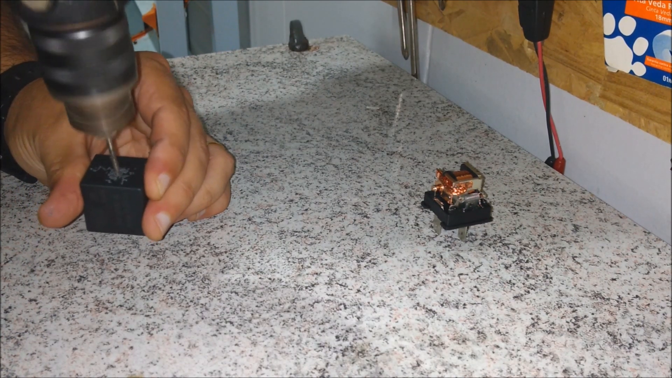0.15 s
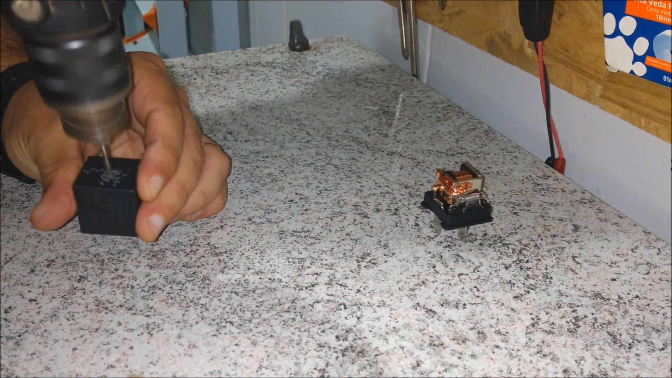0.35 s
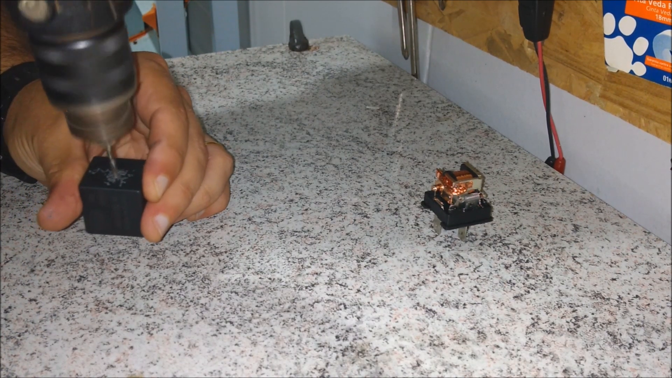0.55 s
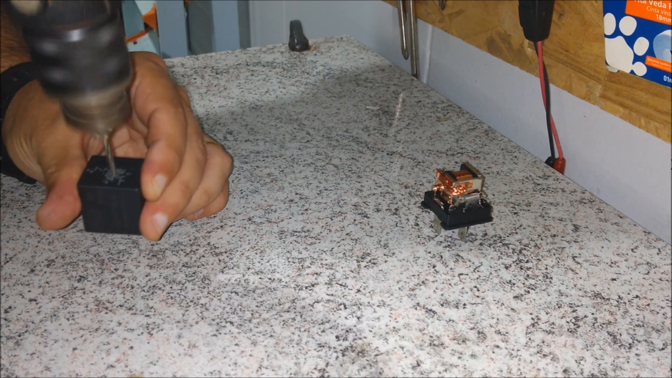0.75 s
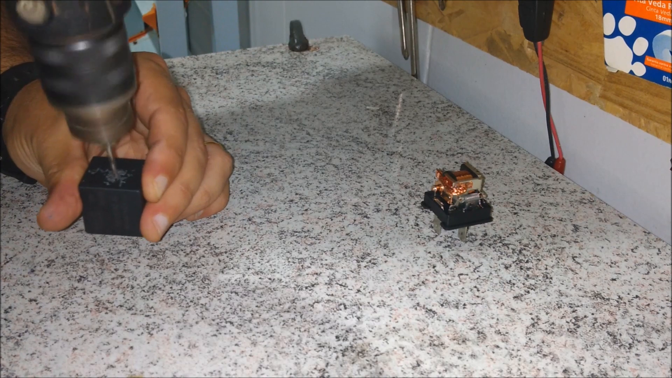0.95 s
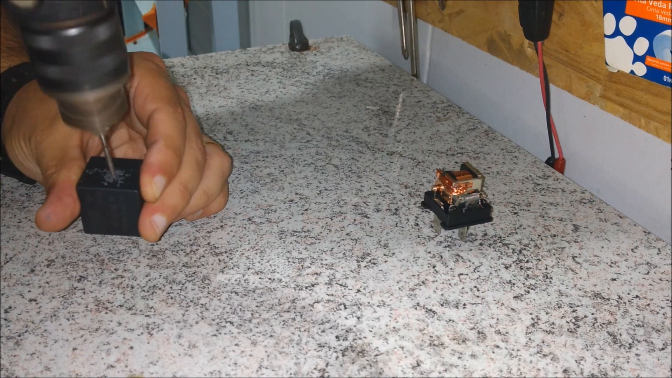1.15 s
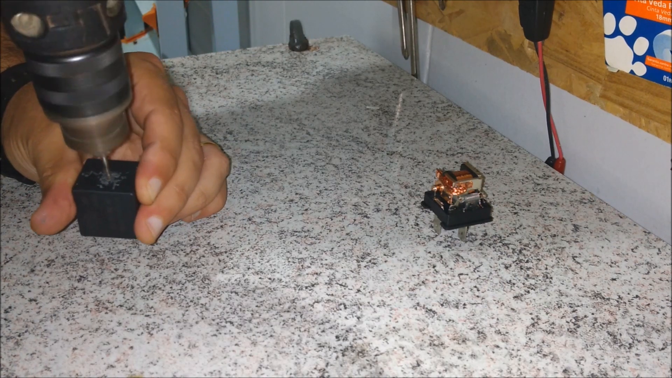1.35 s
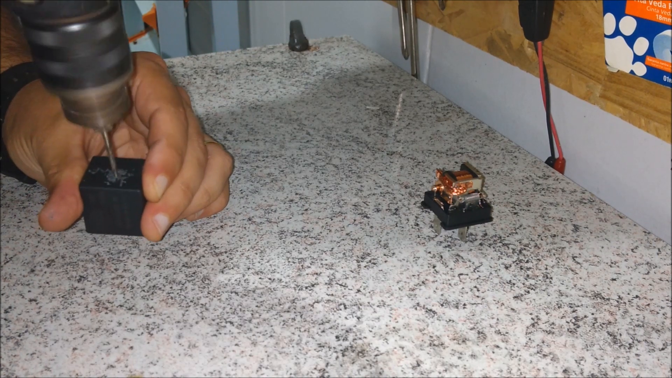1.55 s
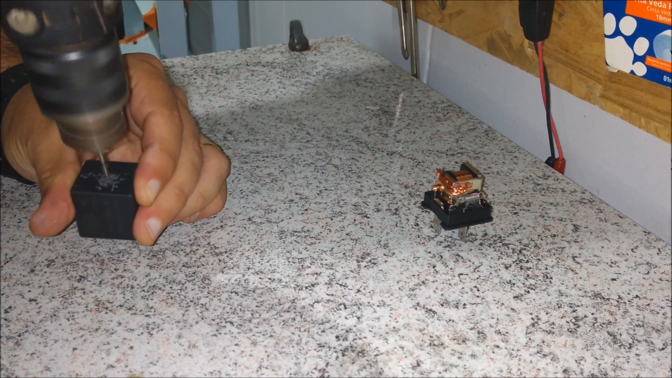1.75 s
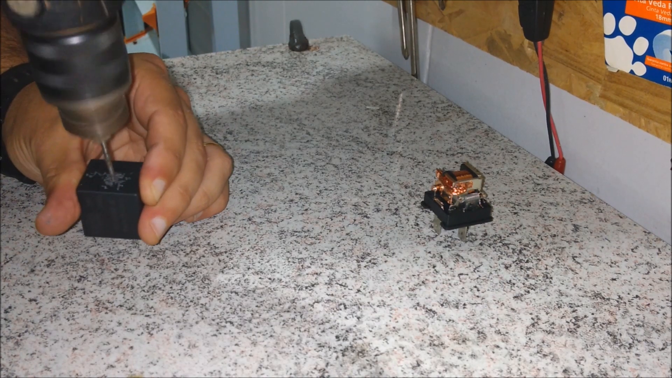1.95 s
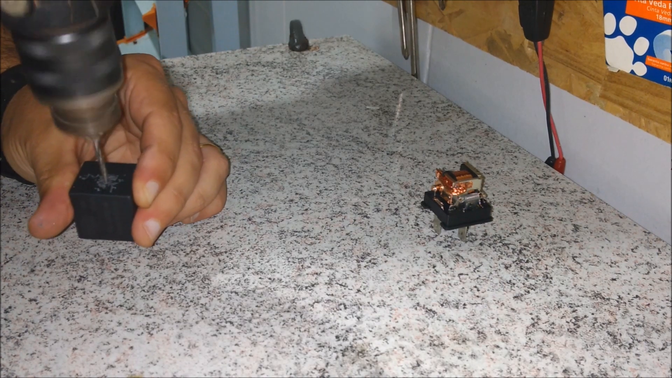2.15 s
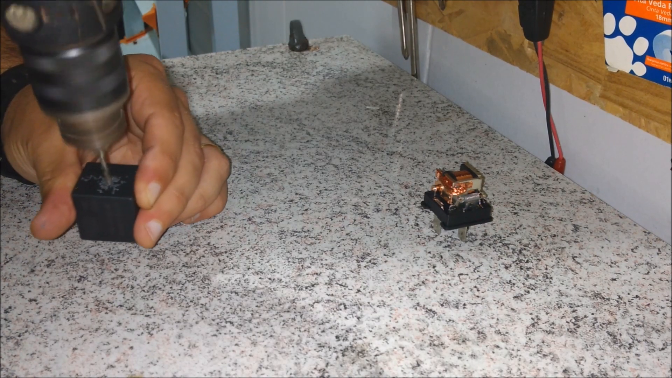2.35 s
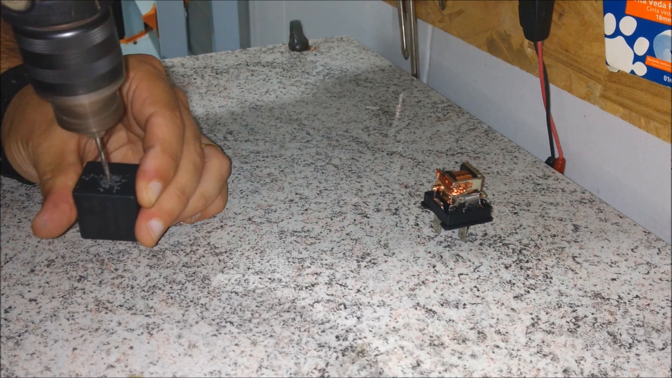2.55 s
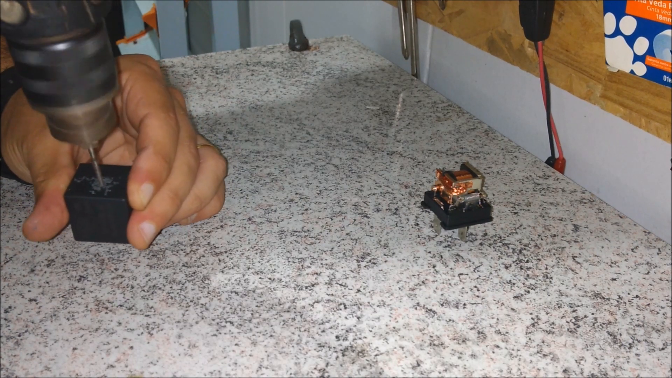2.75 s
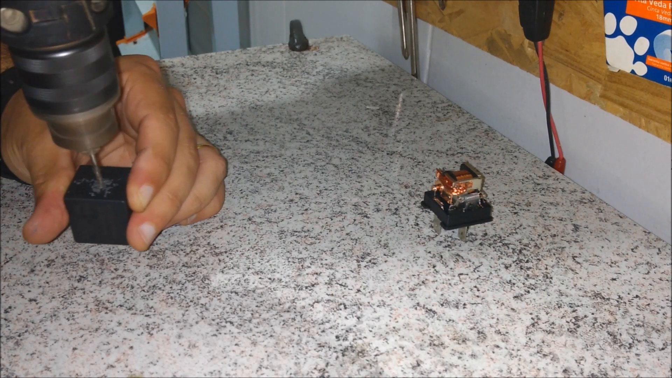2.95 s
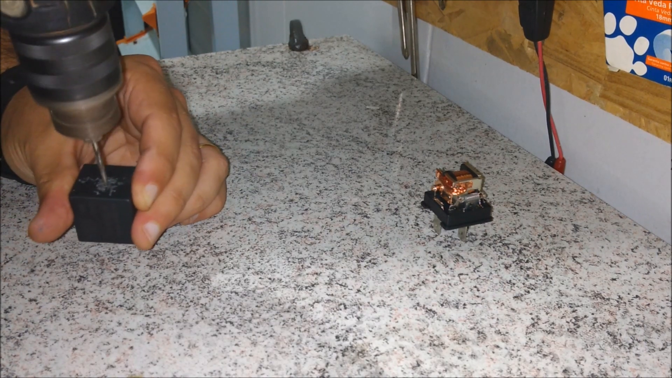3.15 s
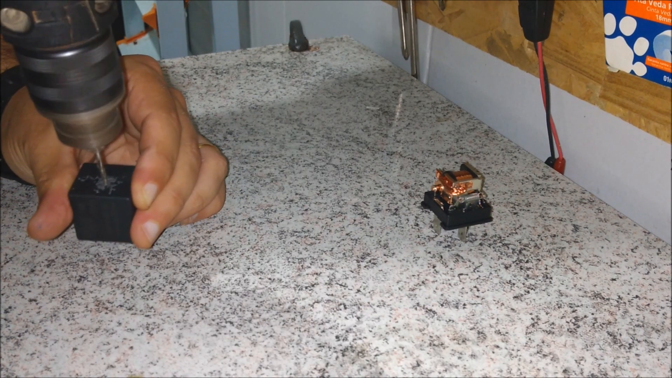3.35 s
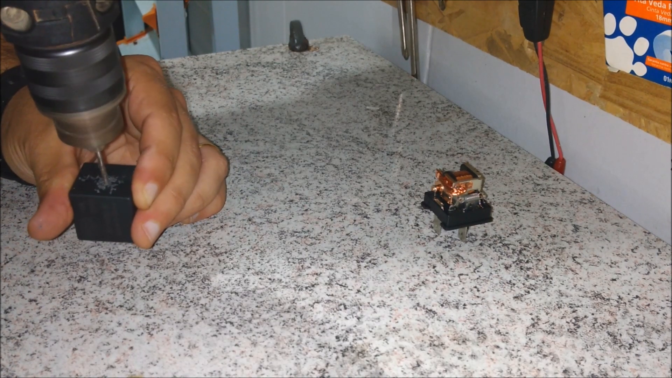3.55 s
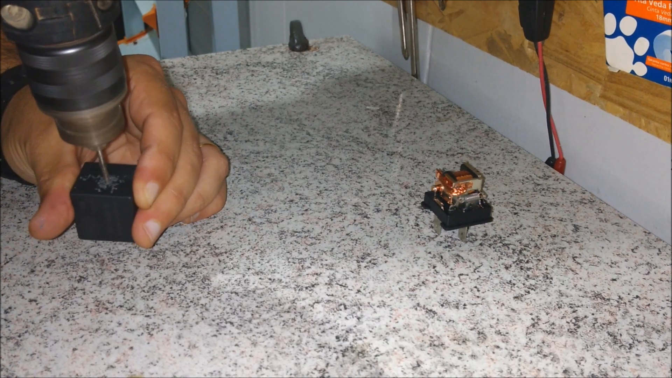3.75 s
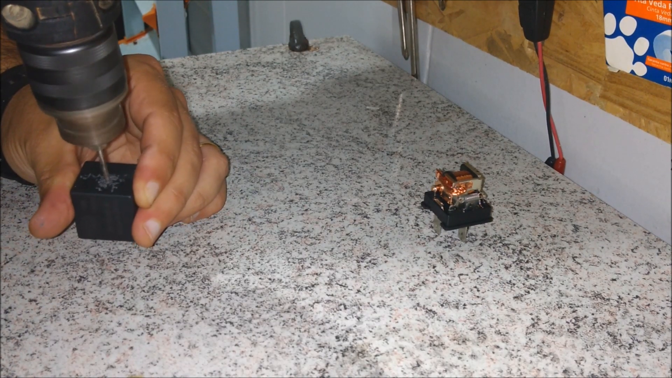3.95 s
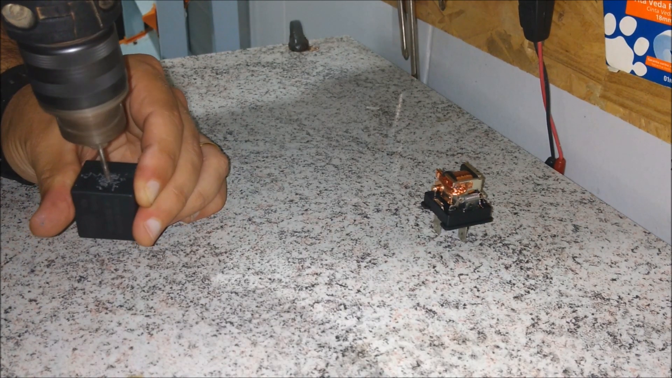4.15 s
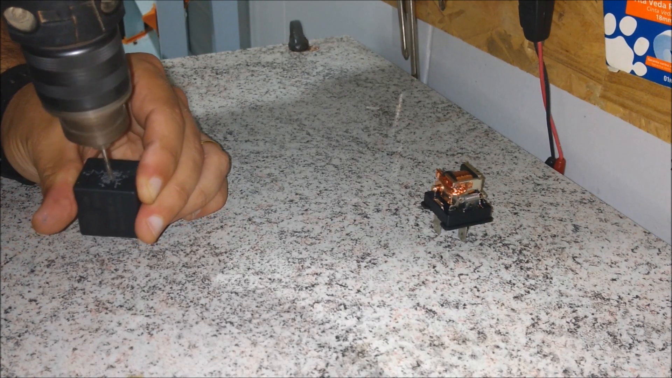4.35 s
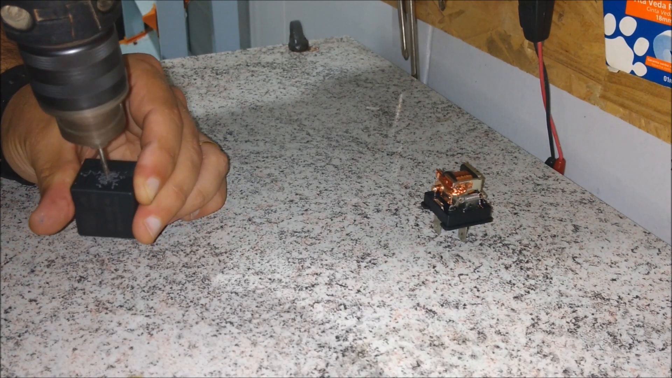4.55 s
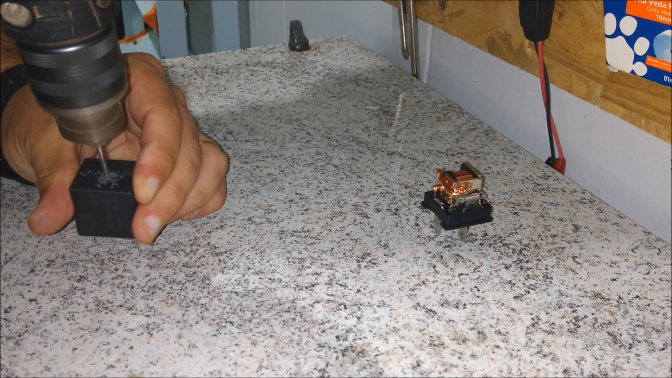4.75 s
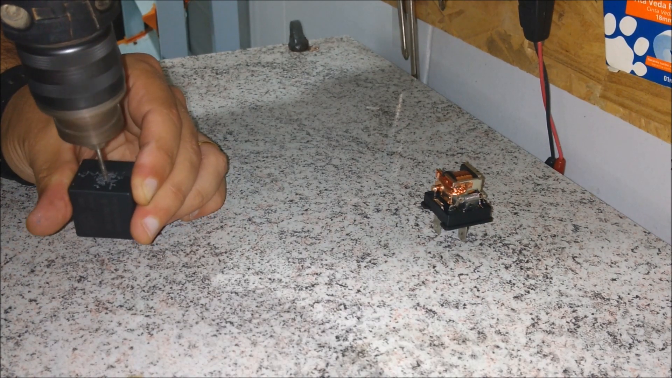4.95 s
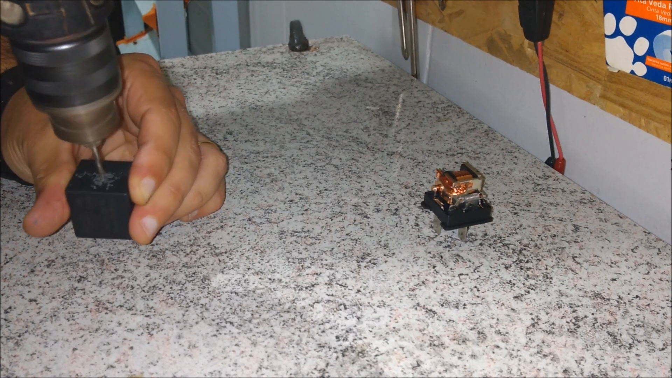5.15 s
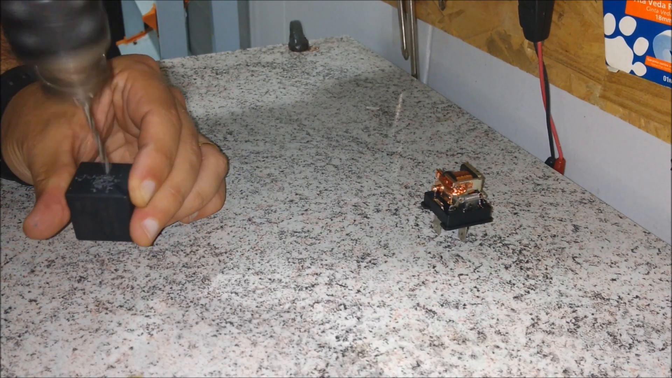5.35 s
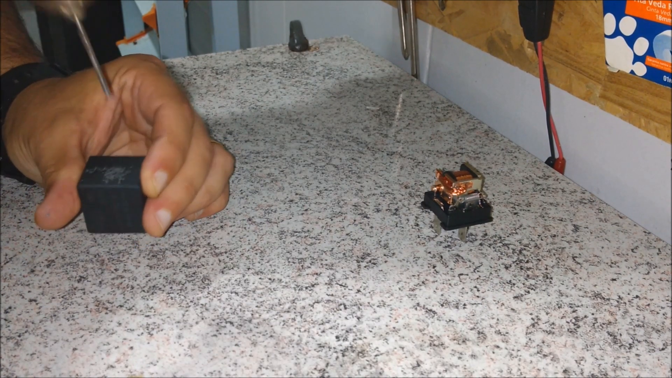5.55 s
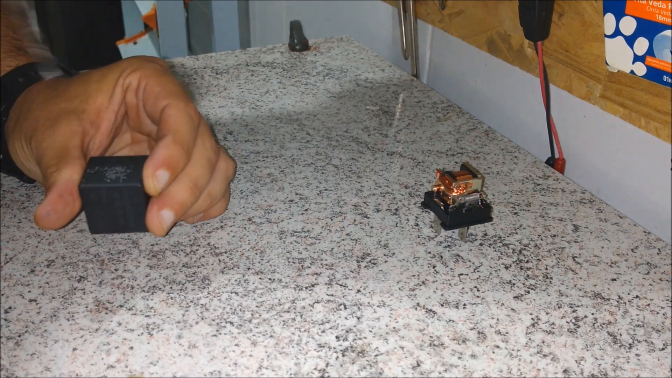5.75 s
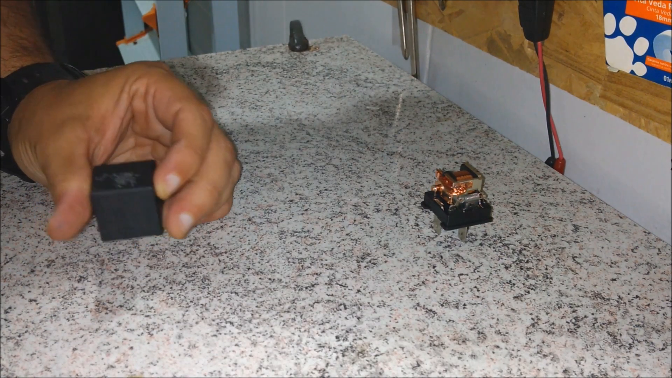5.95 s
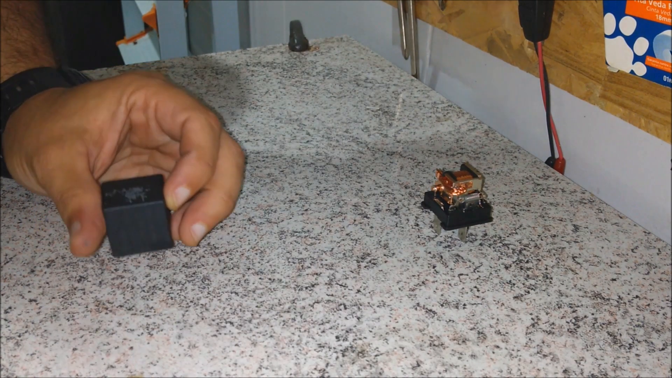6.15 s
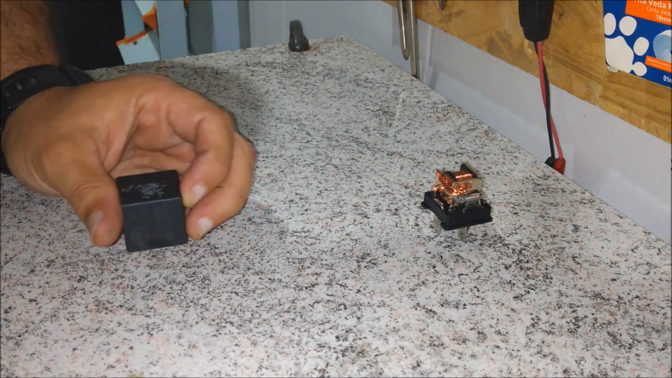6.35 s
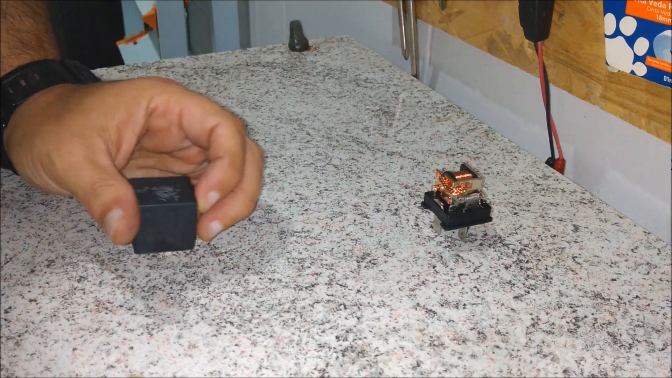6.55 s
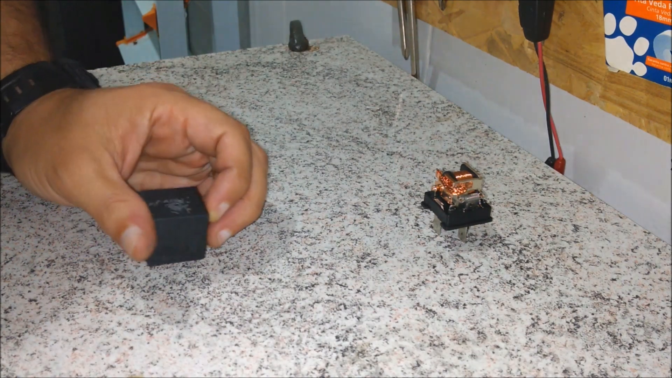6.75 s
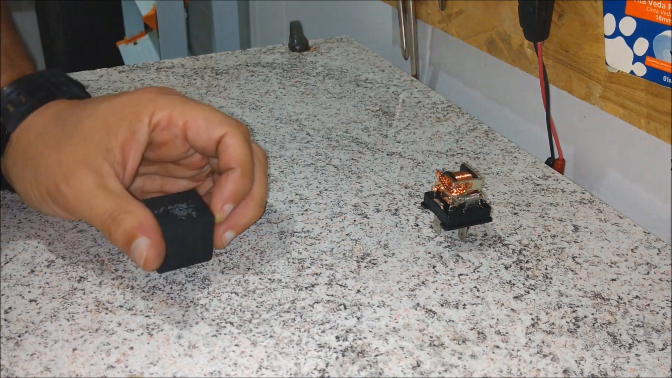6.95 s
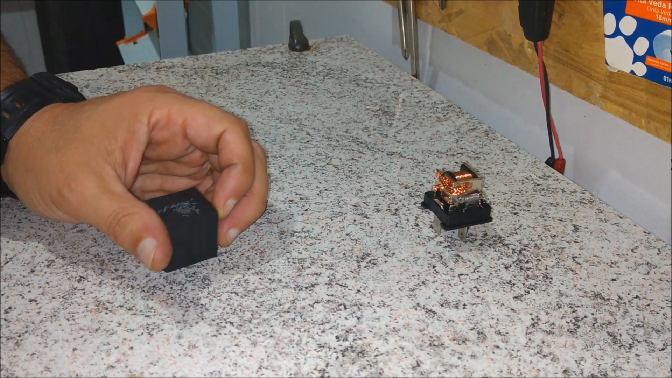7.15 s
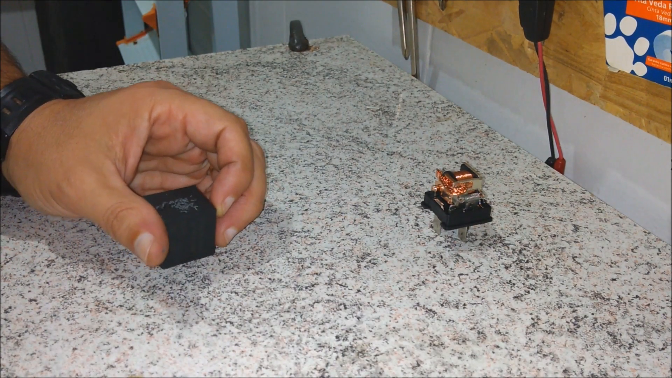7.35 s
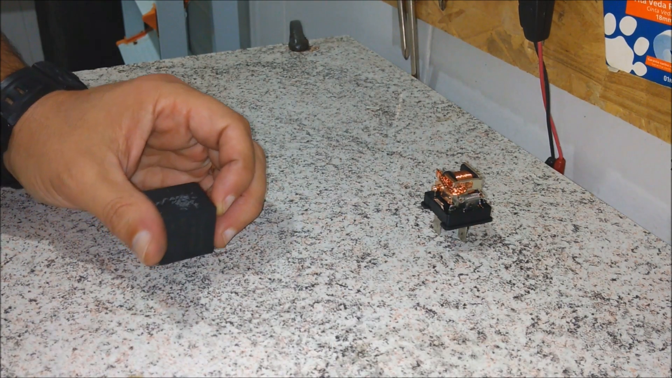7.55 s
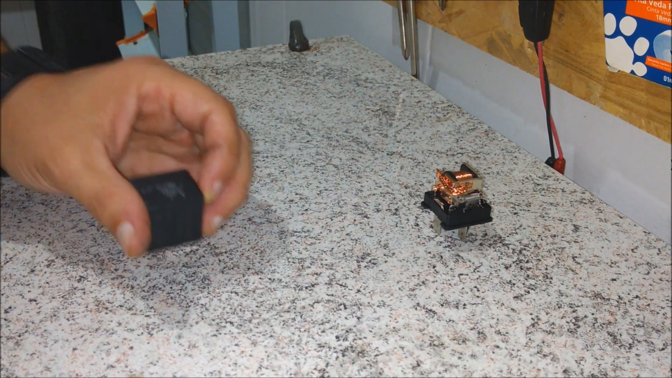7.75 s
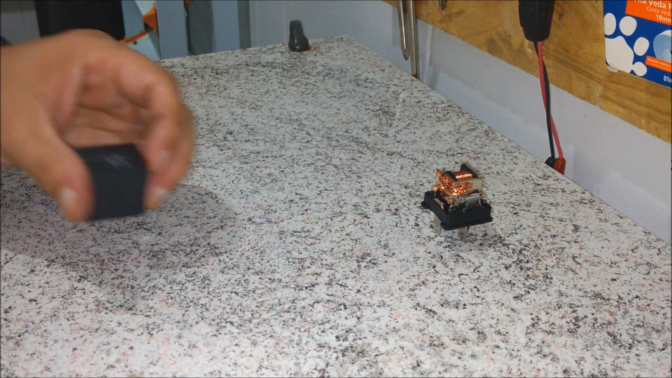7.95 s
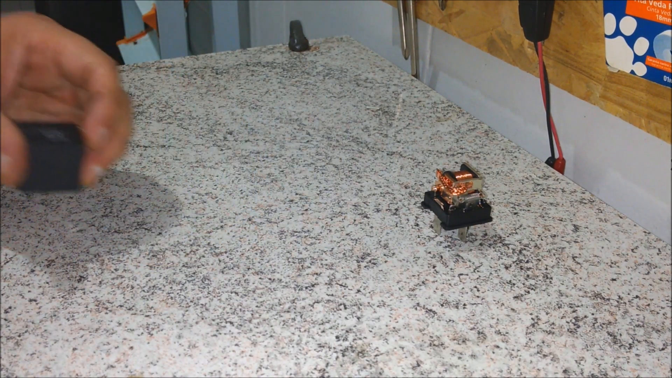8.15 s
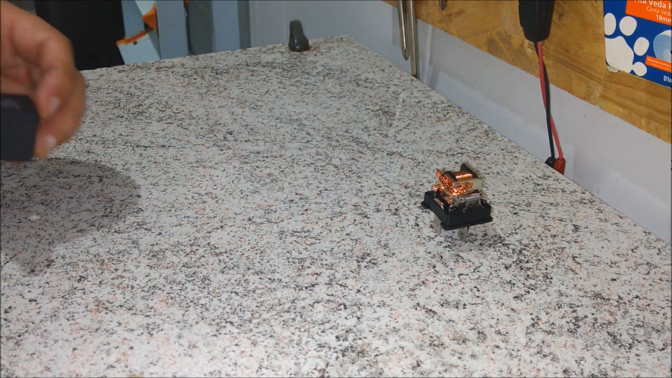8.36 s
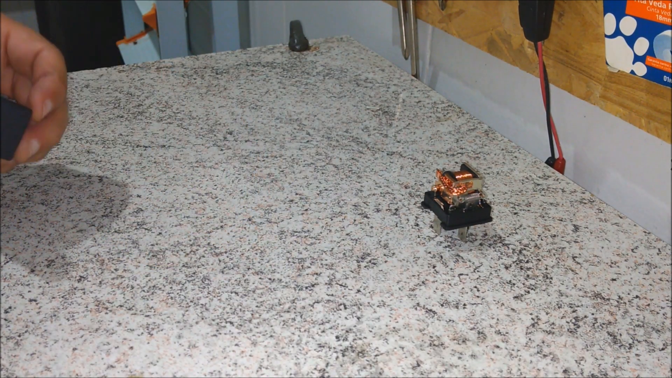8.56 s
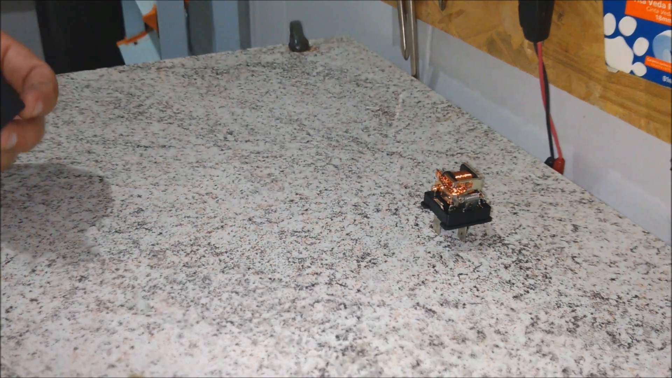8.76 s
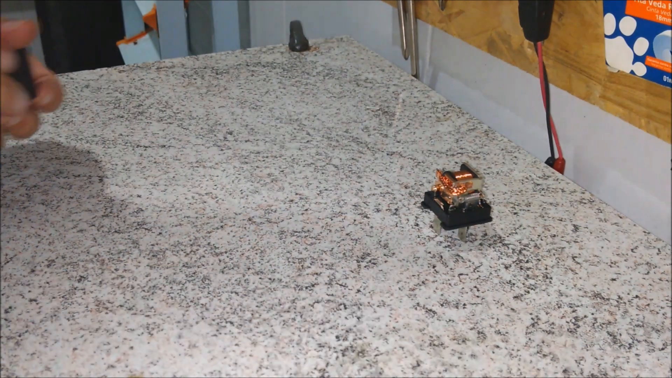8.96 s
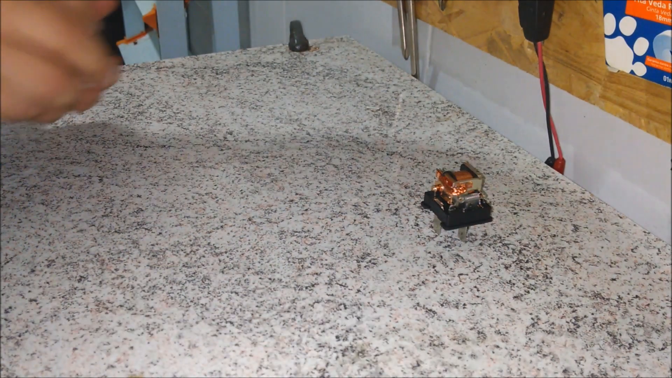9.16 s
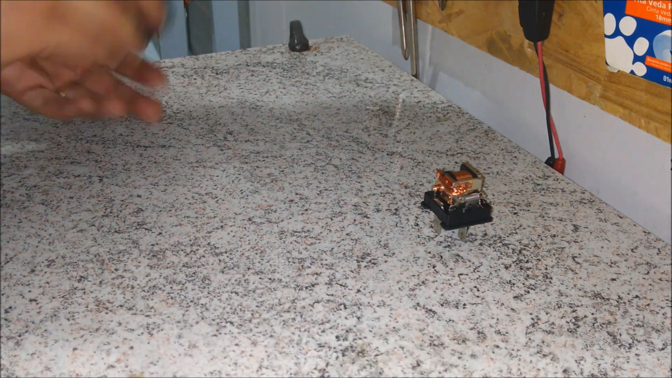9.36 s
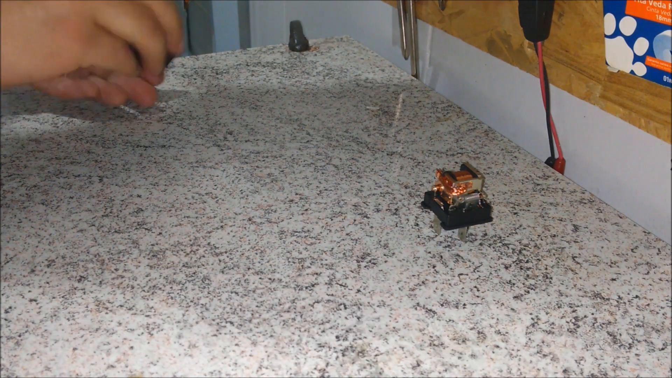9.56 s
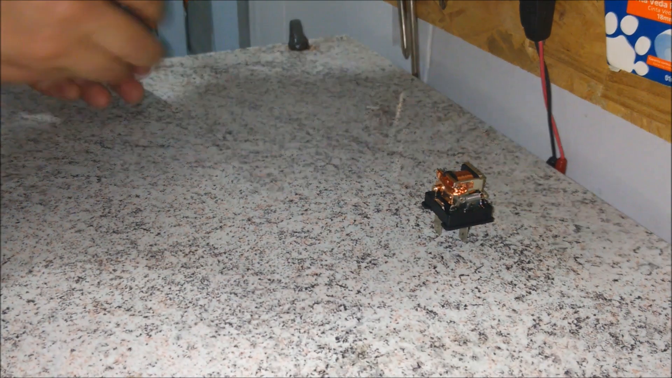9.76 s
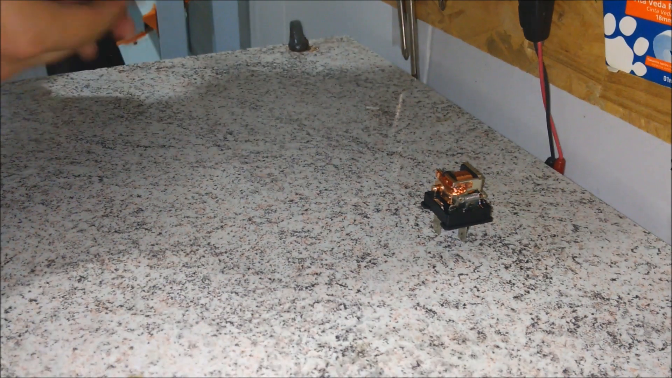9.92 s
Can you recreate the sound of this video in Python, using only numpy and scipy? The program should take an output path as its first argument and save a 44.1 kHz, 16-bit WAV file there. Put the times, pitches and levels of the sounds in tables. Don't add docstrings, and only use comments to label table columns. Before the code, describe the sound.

Close stereo pickup in a small hard room: a mains hand drill at low speed grinds into a small plastic box, rough and rattling, with irregular snags and crackling brush sparks. After about five and a half seconds power is released; a thin whine slides down and the gears clunk to rest. Then the box is tapped and rubbed on a stone bench, with soft low thuds and quiet room air.

```python
import sys
import numpy as np
from scipy import signal
from scipy.fft import rfft, irfft, next_fast_len
from scipy.io import wavfile

SR = 44100
rng = np.random.default_rng(int(sys.argv[2]) if len(sys.argv) > 2 else 0)


def to_wav(s):
    ch = np.atleast_2d(s).T
    pcm = np.round(np.clip(ch, -1, 1) * 32767)
    wavfile.write(sys.argv[1], SR, pcm.astype(np.int16))


def voltage_ratio(decibels):
    exponent = np.asarray(decibels, float) / 20
    return 10 ** exponent


N = 440559

# start_s, peak_db
SNAGS = [(0.015, -19), (0.033, -16), (0.052, -16), (0.087, -30), (0.17, -25), (0.218, -23), (0.237, -20),
         (0.287, -34), (0.35, -23), (0.368, -19), (0.386, -25), (0.416, -18), (0.502, -30), (0.584, -24),
         (0.603, -21), (0.62, -16.5), (0.665, -24), (0.686, -13.5), (0.799, -29), (0.816, -16),
         (0.836, -13.5), (0.903, -17), (0.982, -22), (1, -15), (1.033, -23), (1.053, -17), (1.068, -21),
         (1.134, -29), (1.216, -22), (1.232, -18), (1.249, -23), (1.354, -21), (1.454, -14), (1.489, -19.5),
         (1.588, -29), (1.637, -23), (1.686, -16.5), (1.727, -14), (1.753, -24), (1.77, -11),
         (1.854, -20.5), (1.888, -16.5), (2.021, -21), (2.053, -17), (2.071, -30), (2.104, -18),
         (2.122, -13.5), (2.17, -22), (2.237, -26), (2.29, -26), (2.354, -24), (2.4, -22), (2.433, -25),
         (2.452, -16), (2.484, -15), (2.572, -17), (2.61, -20), (2.667, -22), (2.684, -16), (2.72, -14.5)]
LATER_SNAGS = [(2.791, -20), (2.822, -14), (2.849, -9), (2.904, -28), (2.923, -27), (2.935, -15.5),
               (2.986, -20), (3.005, -19), (3.034, -25), (3.051, -29), (3.185, -11.5), (3.216, -22),
               (3.235, -20), (3.25, -15), (3.268, -18), (3.338, -18), (3.384, -17), (3.401, -27),
               (3.42, -11), (3.471, -16.5), (3.501, -19), (3.538, -21), (3.557, -13.5), (3.653, -30),
               (3.672, -28), (3.734, -20), (3.753, -23), (3.773, -15.5), (3.823, -26), (3.854, -12),
               (3.936, -31), (3.991, -17.5), (4.052, -31), (4.072, -27), (4.088, -15), (4.235, -21),
               (4.253, -17), (4.316, -21), (4.335, -35), (4.386, -27), (4.402, -32), (4.421, -18.5),
               (4.435, -13), (4.486, -36), (4.507, -18), (4.639, -23), (4.736, -21), (4.84, -17),
               (4.885, -26), (4.944, -23), (5.002, -26), (5.026, -32), (5.123, -21), (5.17, -19),
               (5.203, -21), (5.226, -23), (5.246, -20), (5.321, -27), (5.341, -16), (5.437, -21)]
# start_s, peak_db
SPARKS = [(0.0184, -36), (0.0343, -46), (0.0528, -34), (0.0867, -41), (0.1226, -20), (0.151, -21),
          (0.2194, -26), (0.2379, -33), (0.3585, -20), (0.4242, -20), (0.4534, -27), (0.504, -27),
          (0.5696, -42), (0.5844, -28), (0.603, -23.5), (0.7352, -38), (0.7891, -33), (0.8185, -19.5),
          (0.872, -32), (0.9028, -25), (0.9363, -23), (0.998, -26), (1.0335, -43), (1.052, -25),
          (1.1348, -22), (1.2341, -31), (1.2496, -30), (1.2855, -23), (1.3359, -29), (1.3543, -29),
          (1.4022, -33), (1.4202, -30), (1.4361, -22), (1.4536, -29), (1.4885, -36), (1.535, -34),
          (1.5874, -27), (1.6866, -50), (1.7035, -22), (1.728, -26), (1.7526, -19), (1.7696, -27),
          (1.8622, -19), (1.9345, -33), (2.0213, -25), (2.0717, -36), (2.1045, -21), (2.2388, -29),
          (2.2692, -34), (2.2882, -29), (2.467, -25), (2.4848, -32), (2.5711, -25), (2.6105, -30),
          (2.7186, -23)]
LATER_SPARKS = [(2.7713, -27), (2.823, -22), (2.9045, -27), (2.9239, -29), (3.0053, -33), (3.12, -34),
                (3.1699, -32), (3.1853, -30), (3.338, -27), (3.3594, -27), (3.4023, -40), (3.421, -25),
                (3.4704, -20), (3.54, -36), (3.5594, -27), (3.6538, -26), (3.754, -24), (3.8384, -33),
                (3.8548, -19.5), (3.9371, -44), (3.965, -20), (3.9735, -20), (4.0713, -28), (4.0878, -24),
                (4.1062, -24), (4.1861, -29), (4.22, -29), (4.236, -44), (4.4026, -31), (4.432, -25),
                (4.4874, -29), (4.506, -21.5), (4.6226, -39), (4.641, -28), (4.6899, -27), (4.7079, -19.5),
                (4.7732, -29), (4.8032, -30), (4.823, -26), (4.8406, -28), (4.9076, -30), (5.0022, -24),
                (5.0262, -44), (5.0556, -37), (5.09, -36), (5.1239, -28), (5.2063, -25), (5.2242, -22),
                (5.249, -24), (5.295, -32), (5.3075, -27), (5.3345, -21), (5.3744, -29), (5.4696, -40),
                (5.492, -29)]
# time_s, level_db
LOAD = [(0.0, -33), (0.61, -35), (0.95, -33.5), (1.44, -34.5), (1.56, -34), (2.37, -36), (2.72, -35.5),
        (3.03, -36.5), (3.38, -35.5), (3.57, -38.5), (4.81, -35.5), (5.05, -35.5), (5.18, -34.5),
        (5.36, -36), (5.45, -36)]
# bite_s, free_length_s, deepest_db
LULLS = [(0.575, 0.07, -2), (1.35, 0.16, -1.5), (1.847, 0.066, -5), (2.42, 0.16, -1.5), (2.992, 0.05, 0.5),
         (3.126, 0.21, -1), (3.655, 0.12, -0.5), (3.74, 0.065, -2.5), (4.065, 0.05, -1.5),
         (4.632, 0.053, -1.5), (4.778, 0.065, -4), (5.32, 0.031, -4.5), (5.454, 0.094, -5)]
# time_s, tooth_rate_hz, whine_db
COAST = [
    (5.5, 1085, -70),
    (5.55, 1055, -47),
    (5.65, 950, -47),
    (5.78, 822, -48),
    (5.95, 640, -53),
    (6.1, 500, -57),
    (6.3, 310, -58),
    (6.5, 120, -80),
]
# start_s, peak_db
FREE_TICKS = [(5.5838, -44), (5.6152, -39), (5.7165, -42), (5.7489, -41), (5.7708, -36), (5.7928, -37),
              (5.8132, -35), (5.836, -36), (5.8571, -35), (5.8771, -37), (5.905, -30), (5.9225, -34),
              (5.959, -36), (6.0312, -36), (6.079, -33), (6.122, -34), (6.158, -29), (6.2128, -36),
              (6.2333, -34), (6.2667, -41), (6.2901, -38), (6.3096, -50), (6.336, -31), (6.374, -42),
              (6.3999, -46), (6.4169, -43), (6.4393, -49), (6.4965, -37)]
# freq_hz, level_db (per Hz)
BODY = [(50, -17), (100, -10), (200, -6.5), (350, 1), (480, 3.5), (700, 0), (1200, -2), (1700, -4),
        (2300, -5.5), (4000, -5.5), (5200, -11.5), (8500, -10.5), (10500, -18), (15500, -21)]
# pitch_hz, width_hz, gain_db
HOUSING = [(479, 40, 5), (614, 50, 2), (800, 70, 3), (1008, 35, 3), (1126, 50, 3), (1223, 30, 6),
           (1370, 50, 4), (1720, 110, 4), (2600, 250, 3), (3070, 200, 3), (4030, 110, 4), (6330, 140, 4),
           (7430, 300, 2), (8900, 500, 3)]
# start_s, knock_db, knock_hz, upper_ring_db, bright_edge_db
CLUNKS = [(6.29, -42, 1000, -32, -39), (6.335, -43, 1040, -43, -38), (6.373, -56, 990, -52, -52),
          (6.49, -30, 1480, -59, -40), (6.496, -35, 1170, -58, -35), (6.526, -32, 640, -50, -35.5),
          (6.591, -36, 670, -47, -56), (6.627, -39.5, 564, -35.5, -45), (6.731, -37, 680, -37, -49),
          (6.833, -48, 700, -45, -70)]
# start_s, knock_db, knock_hz, upper_ring_db, bright_edge_db
TICKS = [(7.479, -47, 900, -56, -70), (7.501, -39, 720, -47, -62), (7.769, -40, 1370, -55, -60),
         (7.78, -64, 1300, -60, -51), (7.847, -32.5, 634, -33.5, -37), (8.477, -49, 383, -55, -49.5),
         (8.827, -40, 575, -61, -49), (8.98, -60, 400, -62, -53), (9.286, -50, 390, -76, -77),
         (9.615, -59, 681, -69, -76), (9.841, -30.5, 460, -32.5, -46), (9.8401, -35, 1880, -70, -73)]
# start_s, knock_db, knock_hz, upper_ring_db, bright_edge_db
TAPS = [
    (6.888, -38, 700, -40, -73),
    (6.894, -27, 412, -53, -65),
    (7.149, -28, 780, -21, -48),
    (7.161, -25, 1024, -47, -28),
    (7.677, -42, 915, -44, -50),
    (7.957, -49, 625, -48, -49),
    (8.007, -25, 325, -49, -54),
    (8.758, -42, 440, -58, -68),
]
# t60_s, edge_low_hz, edge_top_hz, edge_speed_up (times faster)
CONTACT = [
    (.055, 3800, 12000, 2),
    (.095, 4000, 15500, 2.5),
    (.21, 4200, 15000, 1.15),
]
# pitch_hz, level_db, t60_s
BOX = [(1280, -9, .03), (1800, 2, .025), (2750, -7, .02), (3400, -6, .03)]
# start_s, hold_s, level_db, centre_hz
STROKES = [(7.482, 0.042, -49, 1130), (7.677, 0.014, -48.5, 950), (7.77, 0.1, -51, 1200),
           (7.947, 0.07, -51.5, 1100), (8.034, 0.045, -59, 960), (8.105, 0.04, -46.5, 935),
           (8.197, 0.044, -48.5, 1050), (8.773, 0.029, -46, 2980)]
# start_s, peak_db, pitch_hz, t60_s
THUDS = [(6.884, -40.5, 184, 0.051), (7.157, -35, 221, 0.048), (7.503, -52, 233, 0.067),
         (7.723, -36, 180, 0.15), (7.85, -44.5, 119, 0.15), (7.996, -29, 187, 0.22),
         (8.023, -30, 178, 0.067), (8.196, -50, 116, 0.09), (8.309, -51, 124, 0.092),
         (8.479, -37.5, 198.6, 0.22), (8.815, -45, 190, 0.063), (8.969, -41, 179, 0.21),
         (9.294, -50, 166, 0.24), (9.831, -53, 316, 0.27)]
# pitch_hz, level_db, t60_s
SLAB = [(113.8, -11.5, 0.39), (221, -1, 0.19), (335, -11.5, 0.22)]
# start_s, level_db, t60_s
LEANS = [(6.3, -63, 4.8), (6.89, -46.5, 1.5), (7.4, -61, 3.6), (8.0, -68, 3), (8.6, -53, 2.4),
         (8.95, -64, 1.2), (9.5, -74, 2), (9.85, -59, 3)]
# start_s, level_db, t60_s
PRESSES = [(6.93, -54, 1.3), (7.72, -31, 1.2), (8.02, -38.5, 3.1), (8.3, -50.5, 4), (8.7, -54, 2.5),
           (9.29, -34, 0.24)]
# freq_hz, level_db (per Hz)
AIR = [(25, 4.5), (60, -16), (120, 0.5), (250, -1.5), (500, -9), (1000, -18), (2000, -19.5), (4000, -23.5),
       (8000, -28), (15500, -33)]
# pitch_hz, width_hz, gain_db
LEFT_PORT = [(440, 26, -3), (625, 70, -3), (932, 190, -5), (1460, 1160, 2), (12000, 5000, 1.5)]

MAINS_HZ, FIRING_S = 59.953, .0042
COAST_START_S, STOP_S = COAST[0][0], 6.62
SNAG_TRIM_DB, SPARK_TRIM_DB = 0.5, -2
# share of cycles, into_cycle_s, scatter_s, level_db, spread_db
SMALL_SNAGS, SMALL_SPARKS = (.7, .0005, .0008, -22, 2.5), (.3, .002, .0015, -35, 3)
SNAG_NOTES_HZ, SNAG_NOTE_DB, SNAG_NOTE_T60_S = (775, 1130, 1248, 1424), -22.5, 0.028
AFTER_SNAG_DB, AFTER_SNAG_T60_S = 6, 0.046
RATTLE_TRIM_DB, HISS_DB, HUM_DB = -8, -45, -52.5
HISS_FOLLOWS, HUM_FOLLOWS = 0.95, 0.64
COAST_DB, COAST_HISS_DB = -38.5, -37.5
SLACK_SPEED, HISS_STEEPNESS = 0.25, 2.1
LIFT_S, LIFT_HUM_DB, LIFTED_HUM_DB = 5.85, -45, -69
ROTOR_TEETH, ROTOR_THROB = 16, .4
FREE_TICK_TRIM_DB, FREE_TICK_T60_S = 6, 0.014
FREE_HISS_DB, FAN_SING_DB, FREE_RING_DB = -1.5, 3, 2
RUB_RISE_DB_PER_S, RUB_FALL_DB_PER_S = 900, 229
WEIGHT_RISE_S, DEEP_REST_DB = 0.011, -83
AIR_DB, RUSTLE_ENDS_S, STILL_DB = -65.5, 9.0, -3
ROOM_T60_S, ROOM_DB, DRILL_ROOM_DB = 0.23, -9.5, -13
WOBBLE_S, WOBBLE_HZ = .0015, .6
CROSS_LAG_S, CROSS_BACK_S = 21.7 / SR, 20.4 / SR
CUTOFF_HZ = 15900


def drill():
    rattle_db, hiss_db, hum_db = drill_levels()
    jolts = mains_jolts()
    coast_s = np.clip(np.arange(N) / SR - COAST_START_S, 0, 1)
    turn = 2 * np.pi * np.cumsum(in_time(COAST)[0]) / SR
    drive = gears(jolts, rattle_db, hum_db, coast_s > 0)
    drive += brushes(jolts, hiss_db, coast_s, turn)
    sound = colour(drive + whine(turn), BODY, HOUSING)
    bass = signal.sosfilt(signal.butter(2, 650, fs=SR, output="sos"), sound[1])
    late = np.roll(bass, int(.0012 * SR))
    return sound - [[.8], [0]] * late - [[.45], [0]] * band(sound[0], 30, 620)


def mains_jolts():
    firings = np.arange(FIRING_S, COAST_START_S, 1 / MAINS_HZ)
    luck = rng.standard_normal((len(firings), 2))
    return swell(marks(firings + .0006 * luck[:, 0], voltage_ratio(3.0 * luck[:, 1])), .035, .001)


def gears(jolts, rattle_db, hum_db, coasting):
    snag_s, peak_db = with_small(SNAGS + LATER_SNAGS, SNAG_TRIM_DB, *SMALL_SNAGS)
    tilt_db = 1.6 * rng.standard_normal(len(snag_s))
    box = voltage_ratio(rattle_db + 4.0) * gear_gate(jolts, 130, 0.061)
    box += swell(marks(snag_s, voltage_ratio(peak_db - 4 - tilt_db)), 0.0059, 0.00072)
    chuck = voltage_ratio(rattle_db + 3.0) * gear_gate(jolts, 220, .7)
    chuck += swell(marks(snag_s, voltage_ratio(peak_db - 1.5 + tilt_db)), 0.007, 0.0008)
    crack = marks(snag_s + 0.00105, voltage_ratio(peak_db + 10.0)) * [[-.6], [1]]
    drive = 0.78 * band(box * noise() + crack, 140, 2420)
    drive += 1.156 * band(chuck * noise() + crack, 1770, 4920)
    wall = rng.integers(0, len(SNAG_NOTES_HZ), len(snag_s))
    for k, hz in enumerate(SNAG_NOTES_HZ):
        plucks = marks(snag_s, voltage_ratio(peak_db + SNAG_NOTE_DB) * (wall == k))
        drive += [[-.6], [1]] * ring(plucks, hz, SNAG_NOTE_T60_S)[None]
    drive += voltage_ratio(rattle_db - 3 - 5 * coasting) * strikes(jolts, 900, 7)
    drive += voltage_ratio(FREE_RING_DB) * coasting * band(chuck * noise(), 2540, 2900)
    return drive + voltage_ratio(hum_db + 17.0) * band(rms_one(box) * noise(), 32, 180)


def brushes(jolts, hiss_db, coast_s, turn):
    coasting = coast_s > 0
    spark_s, spark_db = with_small(SPARKS + LATER_SPARKS, SPARK_TRIM_DB, *SMALL_SPARKS)
    brush = voltage_ratio(hiss_db + 11.5) * gear_gate(jolts, 200, 0.13)
    brush += swell(marks(spark_s, voltage_ratio(spark_db + 5)), 0.017, 0.00016)
    brush *= 1 + ROTOR_THROB * coasting * np.sin(turn / ROTOR_TEETH)
    tick_s, tick_db = np.transpose(FREE_TICKS)
    brush += swell(marks(tick_s, voltage_ratio(tick_db + FREE_TICK_TRIM_DB)), FREE_TICK_T60_S, .0003)
    slots = noise() * brush * coasting
    sing = voltage_ratio(FAN_SING_DB) * (band(slots, 7760, 7780) + band(slots, 9040, 9080))
    hiss = band(brush * noise(), 4550, 12000) * voltage_ratio(FREE_HISS_DB * coasting)
    top = band(brush * noise(), 11650, 18800) * voltage_ratio(-5.0 * coasting - 4.2 * coast_s)
    return sing + hiss + top


def whine(turn):
    teeth = np.zeros((2, N))
    for k, db in enumerate([-8, 4, 1, 0, -4, -8], 1):
        teeth += np.sin(k * turn + [[0], [k]]) * voltage_ratio(db)
    high = 1.3 * band(band(teeth, 2450, 3300), 2400, 3450)
    low = [[.25], [.6]] * band(band(teeth, 1780, 2150), 1720, 2200)
    return (high + low) * voltage_ratio(in_time(COAST, -150)[1])


def gear_gate(jolts, per_s, depth):
    sizes = voltage_ratio(4.5 * np.minimum(rng.exponential(1, N), 3))
    knocks = (rng.random(N) < per_s * (.3 + 2 * jolts) / SR) * sizes
    load = np.where(np.arange(N) / SR < COAST_START_S, 1, .12)
    return rms_one(1 + 3.4 * jolts + depth * load * swell(knocks, .012, .0003))


def strikes(jolts, per_s, cycles):
    sizes = voltage_ratio(4.5 * np.minimum(rng.exponential(1, (2, N)), 3)) * rng.choice([-1, 1], (2, N))
    struck = sizes * (rng.random(N) < per_s * (.4 + 2.5 * jolts) / SR)
    dealt = rng.integers(0, 14, N)
    out = np.zeros((2, N))
    for k, hz in enumerate(np.geomspace(520, 4300, 14)):
        out += hz / 1000 * ring(struck * (dealt == k) + 1e-18, hz, cycles / hz)
    return rms_one(out)


def drill_levels():
    t = np.arange(N) / SR
    load_db = in_time(LOAD)[0] + grip_db()
    swing_db = load_db - np.mean(np.array(LOAD)[:, 1])
    speed = np.clip((STOP_S - t) / (STOP_S - COAST_START_S), 1e-4, 1)
    run_down_db = 20 * np.log10(speed / (speed + SLACK_SPEED))
    boring = t < COAST_START_S
    rattle_db = np.where(boring, load_db + RATTLE_TRIM_DB, COAST_DB + run_down_db)
    hiss_db = np.where(boring, HISS_DB + HISS_FOLLOWS * swing_db, COAST_HISS_DB + HISS_STEEPNESS * run_down_db)
    free_db = np.interp(t, [LIFT_S - .1, LIFT_S + 0.24], [LIFT_HUM_DB, LIFTED_HUM_DB]) + run_down_db / 2
    hum_db = np.where(boring, HUM_DB + HUM_FOLLOWS * swing_db, free_db)
    return rattle_db, hiss_db, hum_db


def grip_db():
    t = np.arange(N) / SR
    snag_s, peak_db = np.transpose(SNAGS + LATER_SNAGS)
    free_db = np.zeros(N)
    for bite_s, length_s, depth_db in LULLS:
        free_db += depth_db * np.sqrt(((t - bite_s + length_s) / length_s).clip(0)) * (t < bite_s)
    shaken = swell(marks(snag_s, voltage_ratio(peak_db + AFTER_SNAG_DB)), AFTER_SNAG_T60_S, 0.0014)
    return free_db + 20 * np.log10(1 + shaken)


def with_small(rows, trim_db, share, into_s, scatter_s, small_db, spread_db):
    cycles = np.arange(1, int(COAST_START_S * MAINS_HZ)) / MAINS_HZ
    luck = rng.standard_normal((len(cycles), 2))
    kept = (rng.random(len(cycles)) < share) & (cycles < COAST_START_S - .03)
    lull_db = np.minimum(grip_db()[(cycles * SR).astype(int)], 0)
    level_db = small_db + spread_db * np.clip(luck[:, 1], -3, 1.5) + 2 * lull_db
    s, db = np.transpose(rows)
    times_s = np.r_[s, cycles + into_s + scatter_s * luck[:, 0]]
    return times_s, np.r_[db + trim_db, np.where(kept, level_db, -120)]


def taps():
    out, grain = np.zeros((2, N)), noise()
    hits = [(*row, *kind) for rows, kind in zip((CLUNKS, TICKS, TAPS), CONTACT) for row in rows]
    for s, knock_db, hz, upper_db, edge_db, t60, low_hz, top_hz, faster in hits:
        at = int((s - .001) * SR)
        hit = grain[:, at:at + int(.4 * SR)].copy()
        hit[:, 0] += [2.0, 6.0]
        dying = voltage_ratio(-60 * np.arange(hit.shape[1]) / SR / t60)
        rattle, blow = hit * dying, hit * dying ** 6
        knock = band(band(rattle, .55 * hz, 1.6 * hz), .4 * hz, 2 * hz) + .05 * ring(blow, hz, .04)
        upper = band(rattle, 1300, 4600)
        for mode_hz, mode_db, ring_s in BOX:
            upper += .075 * voltage_ratio(mode_db) * ring(blow, mode_hz, ring_s)
        edge = band(hit * dying ** faster, low_hz, top_hz)
        for part, db in ((knock, knock_db - 0.5), (upper, upper_db + 1), (edge, edge_db + 6)):
            out[:, at:at + hit.shape[1]] += voltage_ratio(db) * part / np.abs(part).max()
    return out


def rubs():
    out, t = np.zeros((2, N)), np.arange(N) / SR
    grains = (rng.random(N) < 300 / SR) * rng.exponential(0.77, N)
    slips = noise() * rms_one(1 + fade(grains, 0.0085))
    dull = rms_one(band(slips, 450, 2300))
    bright = rms_one(band(slips, 1670, 4100) + 0.53 * band(slips, 1900, 9600))
    for s, hold_s, top_db, centre_hz in STROKES:
        rise_db = RUB_RISE_DB_PER_S * (s - t).clip(0)
        fall_db = RUB_FALL_DB_PER_S * (t - s - hold_s).clip(0)
        share = (centre_hz - 500) / 3000
        out += voltage_ratio(top_db - rise_db - fall_db - 4.5) * (np.sqrt(1 - share) * dull + np.sqrt(share) * bright)
    return out


def thuds():
    out = np.zeros(N)
    for s, db, hz, t60 in THUDS:
        push = marks([s, s + 1 / hz, s + 2 / hz], voltage_ratio(db - 3.0) * np.array([.6, 1, 1]))
        out += ring(push, hz, t60)
    blows = marks(np.array(THUDS)[:, 0], voltage_ratio(np.array(THUDS)[:, 1]))
    for hz, db, t60 in SLAB:
        out += voltage_ratio(db) * ring(blows, hz, t60)
    return band(out, 100, 810) * voltage_ratio([[-1], [0.5]])


def weight(rows):
    return sum(swell(marks([s], voltage_ratio(db)), t60, WEIGHT_RISE_S) for s, db, t60 in rows)


def stillness():
    deep = rms_one(band(band(noise(), 44, 68), 35, 80))
    slab = rms_one(ring(noise(), SLAB[0][0], 0.38))
    slab = slab + 0.29 * slab[::-1]
    settling = (np.arange(N) / SR - RUSTLE_ENDS_S).clip(0, .2) / 0.21
    air = voltage_ratio(AIR_DB + 10.5 + STILL_DB * settling) * colour(noise(), AIR)
    return air + (voltage_ratio(DEEP_REST_DB) + weight(LEANS)) * deep + voltage_ratio(-9.5) * weight(PRESSES) * slab


def room(x):
    t = np.arange(int(.5 * SR)) / SR
    tail = band(rng.standard_normal((2, len(t))) * voltage_ratio(-60 * t / ROOM_T60_S) * (t > .004), 210, 7300)
    tail /= np.linalg.norm(tail, axis=1, keepdims=True)
    return signal.oaconvolve(x, tail, axes=-1)[:, :N]


def noise():
    return rng.standard_normal((2, N))


def marks(times_s, sizes):
    out = np.zeros(N)
    np.add.at(out, (np.asarray(times_s) * SR).astype(int).clip(0, N - 1), sizes)
    return out + 1e-18


def fade(x, t60):
    return signal.lfilter([1], [1, -voltage_ratio(-60 / (t60 * SR))], x)


def swell(x, t60, rise_s):
    return fade(fade(x, rise_s * np.log(1000)), t60) / (rise_s * SR)


def ring(x, hz, t60):
    r, w = voltage_ratio(-60 / (t60 * SR)), 2 * np.pi * hz / SR
    return signal.lfilter([0, np.sin(w)], [1, -2 * r * np.cos(w), r * r], x)


def band(x, low_hz, high_hz):
    return signal.sosfilt(signal.butter(2, [low_hz, high_hz], "band", fs=SR, output="sos"), x)


def peaks_db(hz, peaks):
    return sum(db / (1 + (2 * (hz - peak_hz) / width_hz) ** 2) for peak_hz, width_hz, db in peaks)


def colour(x, points, peaks=()):
    hz = np.linspace(1, SR / 2, 4097)
    point_hz, point_db = np.transpose(points)
    db = np.interp(np.log(hz), np.log(point_hz), point_db) + peaks_db(hz, peaks)
    cepstrum = irfft(np.log(voltage_ratio(db)))
    cepstrum[1:4096] *= 2
    response = irfft(np.exp(rfft(cepstrum[:4097], 8192)))
    return signal.oaconvolve(x, (response / np.linalg.norm(response))[None], axes=-1)[:, :N]


def rms_one(x):
    return x / np.sqrt(np.mean(x ** 2) + 1e-20)


def in_time(rows, off_db=None):
    s, *columns = np.transpose(rows)
    return [np.interp(np.arange(N) / SR, s, c, off_db, off_db) for c in columns]


def scene():
    tool, handling, t = drill(), taps() + rubs(), np.arange(N) / SR
    path_s = WOBBLE_S * (1 + np.sin(2 * np.pi * WOBBLE_HZ * t))
    swayed = np.array([np.interp(t - path_s, t, side) for side in tool])
    walls = room(voltage_ratio(DRILL_ROOM_DB) * swayed + voltage_ratio(ROOM_DB) * handling)
    return tool + handling + walls + thuds() + stillness()


def top_cut(x):
    return signal.sosfilt(signal.butter(12, 16430, fs=SR, output="sos"), x)


def record(dry):
    size = next_fast_len(N + 4096)
    hz = np.arange(1, size // 2 + 2) * SR / size
    reach = voltage_ratio([[2.5], [-2.5]]) / (1 + (hz / 5000) ** 1.8) / (1 + (620 / hz) ** 5)
    late = np.exp(-2j * np.pi * hz * np.array([[CROSS_LAG_S], [CROSS_BACK_S]]))
    port_colour = voltage_ratio(peaks_db(hz, LEFT_PORT) * [[1], [0]])
    ports = rfft(dry, size)
    wide = irfft((ports - ports[::-1] * late * reach) * port_colour, size)[:, :N]
    wide = wide * voltage_ratio([[-2.0], [0.3]])
    wide = signal.sosfilt(signal.cheby2(12, 70, CUTOFF_HZ + 500, fs=SR, output="sos"), wide)
    wide = signal.sosfilt(signal.butter(3, 45, "high", fs=SR, output="sos"), wide)
    return top_cut(wide)


dry = scene()
out = record(dry)
to_wav(out)
```